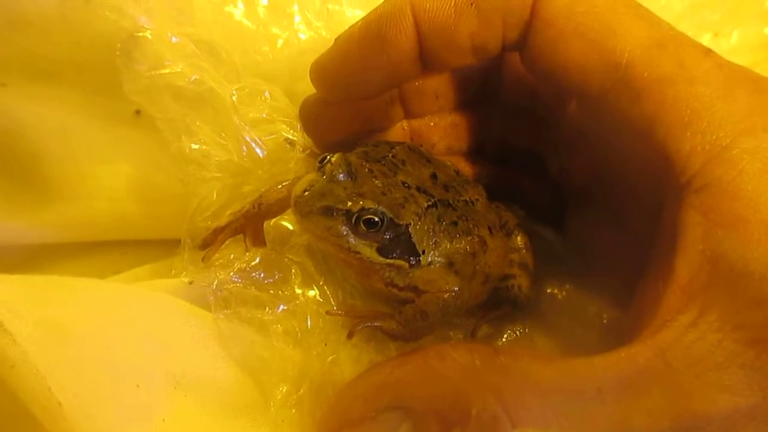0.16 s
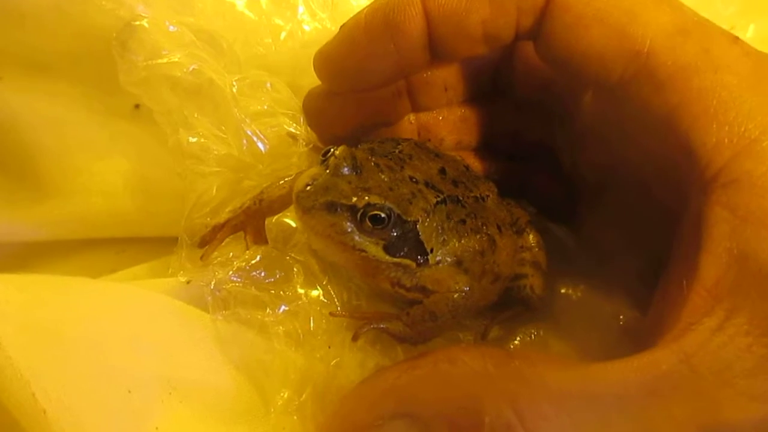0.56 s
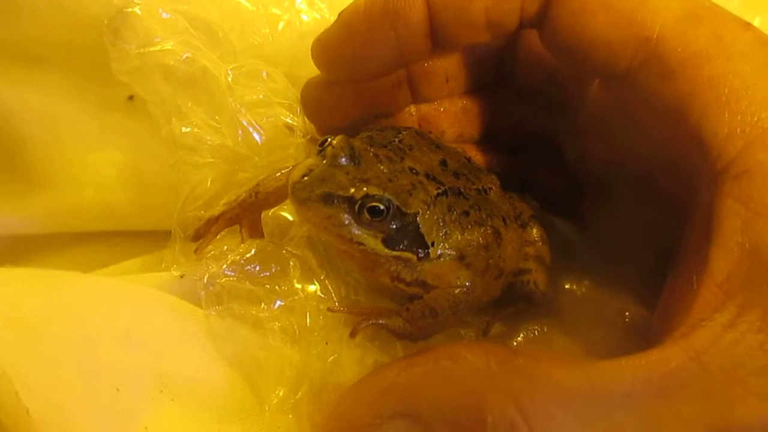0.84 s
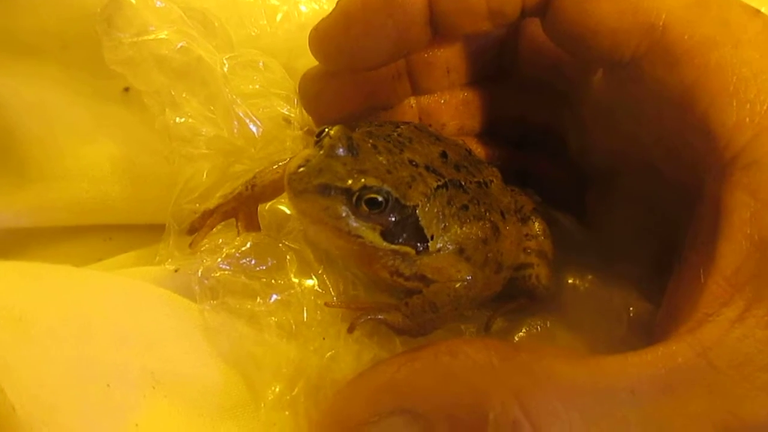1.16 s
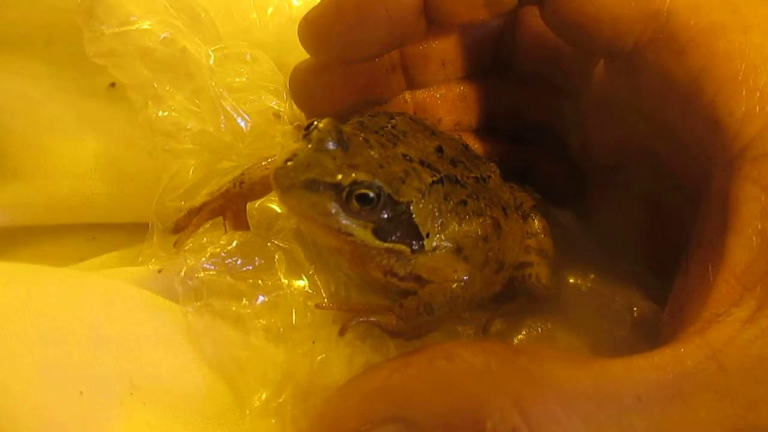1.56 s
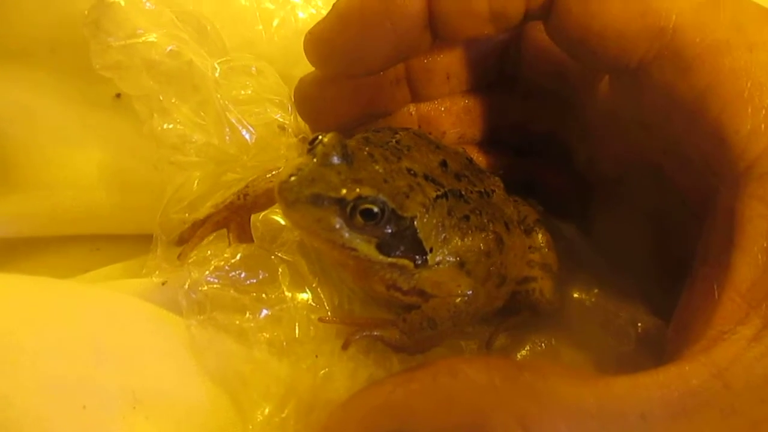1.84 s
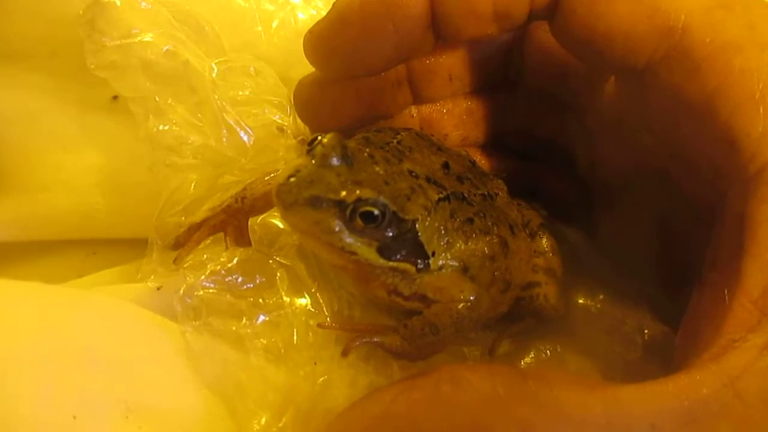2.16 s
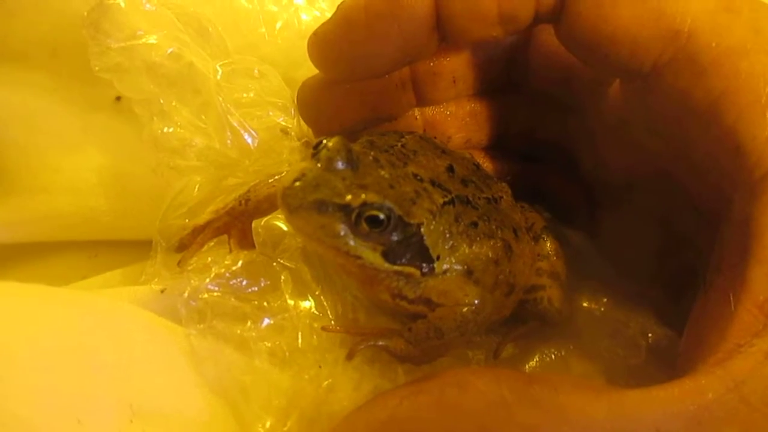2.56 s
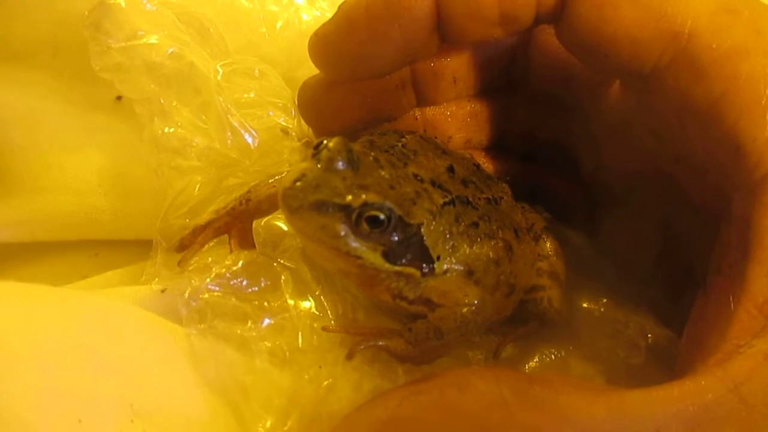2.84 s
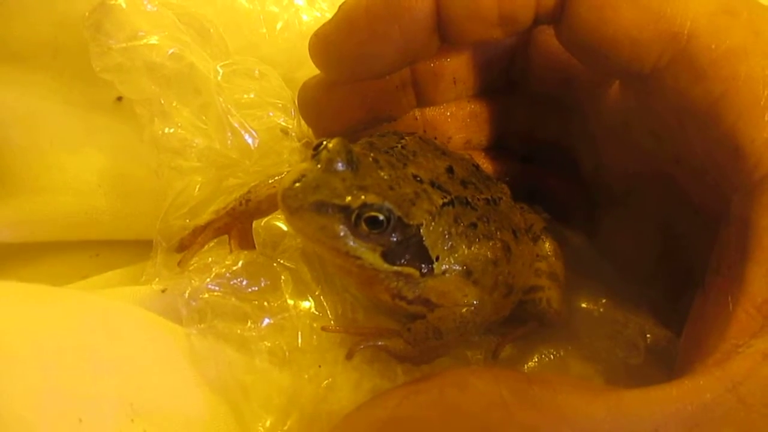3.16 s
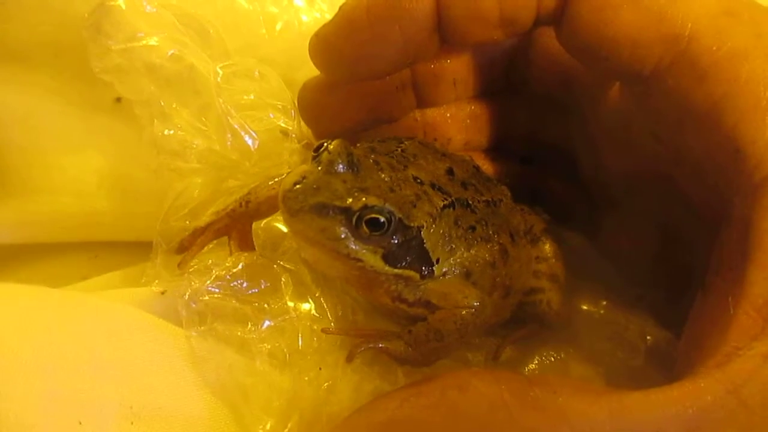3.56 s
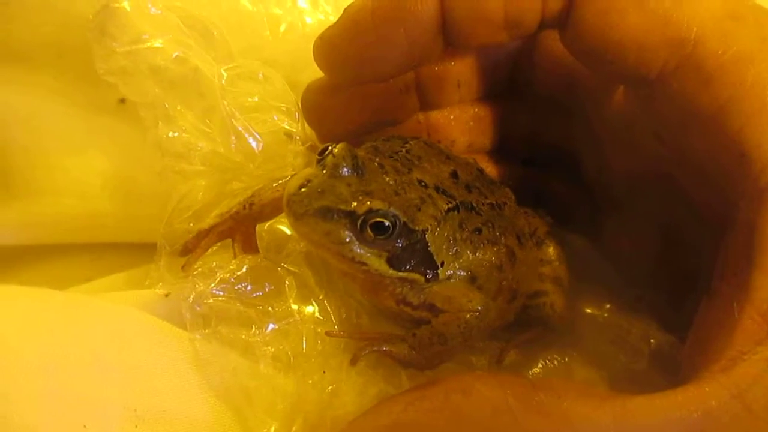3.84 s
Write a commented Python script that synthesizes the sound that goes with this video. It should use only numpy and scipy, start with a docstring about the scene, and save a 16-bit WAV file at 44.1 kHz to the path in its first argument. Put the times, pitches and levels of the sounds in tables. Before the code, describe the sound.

Close frog croaks come over the fan-like hum and hiss of a room. They start about halfway through, a rapid string of short pulses between two deeper ones, while wet plastic faintly ticks and rustles.

```python
"""A frog, cupped in a hand on wet plastic, croaks in a run of pulses, about twelve a second.
Each pulse is one larynx snap through damped throat and body resonances, with a wet rasp.
Two deep pulses leave a low ring, the lighter ones a faint higher one.
Faint wet ticks, rustles and handling bumps come over the steady hum and hiss of a room."""
import sys
import numpy as np
from scipy import signal
from scipy.fft import rfft, irfft
from scipy.io import wavfile

SR = 44100
rng = np.random.default_rng(int(sys.argv[2]) if len(sys.argv) > 2 else 0)


def dump_mix(stems):
    """Bounce the given channels to the path in sys.argv[1] as a 16-bit WAV at rate SR."""
    frames = np.atleast_2d(stems).T  # one column per channel
    limited = np.clip(frames, -1, 1)  # hard clip at full scale
    pcm = np.round(limited * 32767).astype(np.int16)
    wavfile.write(sys.argv[1], SR, pcm)


N = 176400
T = np.arange(N) / SR
HZ = np.fft.rfftfreq(N, 1 / SR)

# Light pulses. Each row: start in seconds, then snap gain, brightness, overtone and ring, all in dB.
LIGHT_PULSES = [(1.8892, -1.5, 1, -36, -60), (2.7296, 8, 5.5, -24, -41), (2.8088, 4.5, -2.5, -38, -34.5),
                (2.8861, 10, 3.5, -26.5, -32), (2.9632, 5, -5.5, -40, -36), (3.0427, 2, -3, -40, -36),
                (3.1206, 6.5, -10.5, -45, -39.5), (3.2037, 2.5, -12, -47, -46),
                (3.2854, 6.5, 1, -30.5, -44), (3.363, 4.5, -7.5, -42, -44.5), (3.4788, -11, 4.5, -47, -69),
                (3.524, 2.5, -8.5, -51, -55), (3.6040, 0.5, -12, -57, -55)]
# Deep pulses. Each row: start in seconds, then snap gain, brightness, overtone, low ring,
# throat ring and rasp offset, all in dB.
DEEP_PULSES = [(2.5380, 13.5, 0.5, -27.5, -28.5, -12.5, -1.5), (3.8872, 11, -3, -31.5, -31, -16.5, -18)]
# Throat and body resonances (+) and hollows (-). Each row: centre in Hz, width in Hz, gain in dB.
BODY_PEAKS = [(448, 136, 8.5), (541, 89, 6.5), (666, 31, -7.5), (762, 130, 3), (1015, 220, 8.5),
              (1166, 49, -3.5), (1305, 67, 14.5), (1430, 85, -8.5), (1750, 820, -10.5), (2610, 1350, -0.5)]
# Wet rasp bands. Each row: centre in Hz, width in Hz, relative level in dB.
RASP_BANDS = [(1810, 290, -1), (2490, 590, 2), (2960, 270, -8.5), (3700, 370, -4.5)]
# Wet ticks. Each row: start in seconds, level in dB.
TICKS = [(2.046, -59), (2.248, -61), (2.368, -57), (2.583, -63), (2.647, -61), (2.7286, -54.5),
         (2.886, -53), (3.445, -52.5), (3.888, -51)]
# Tick bands. Each row: centre in Hz, width in Hz, relative level in dB.
TICK_BANDS = [(2530, 500, -4), (4340, 1900, -1), (5740, 520, -1), (7400, 1400, -9)]
# Rustles. Each row: middle in seconds, length in seconds, air level in dB, hollow note level in dB.
RUSTLES = [(1.956, 0.072, -68, -53), (2.048, 0.02, -68, -62), (2.124, 0.046, -66, -62),
           (2.247, 0.02, -58, -47), (2.371, 0.02, -61.5, -60), (2.443, 0.037, -63, -75),
           (2.584, 0.0076, -59, -64), (2.642, 0.036, -56.5, -52), (2.714, 0.027, -62, -62),
           (2.953, 0.022, -60, -44.5), (3.043, 0.034, -65, -62), (3.127, 0.025, -62, -62),
           (3.205, 0.03, -66, -68), (3.35, 0.035, -69, -63), (3.451, 0.019, -65, -45),
           (3.518, 0.025, -61, -60), (3.60, 0.036, -62, -60), (3.712, 0.054, -58, -64),
           (3.804, 0.051, -65, -49.5), (3.866, 0.064, -64, -56), (3.99, 0.04, -58.5, -67)]
# Rustle bands. Each row: centre in Hz, width in Hz, relative level in dB.
RUSTLE_BANDS = [(2600, 860, 2), (3770, 700, 4.5), (5700, 800, -3.5), (7300, 1500, -16)]
# Handling bumps. Each row: middle in seconds, length in seconds, level in dB, centre in Hz.
BUMPS = [(0.511, 0.041, -49.5, 60), (0.763, 0.052, -51, 83), (1.959, 0.048, -54, 425),
         (3.99, 0.025, -48, 433)]
# Room hiss spectrum. Each row: frequency in Hz, density in dB per Hz.
HISS_SPECTRUM = [(20, -86.5), (45, -75), (100, -81.5), (250, -84.5), (400, -87.5), (600, -86),
                 (1060, -86.5), (1650, -86), (1820, -95.5), (2400, -98), (4300, -104), (7000, -105.5),
                 (10000, -109), (13000, -113), (15500, -118)]
# Fan-like hum bands. Each row: centre in Hz, width in Hz, rms level in dB.
HUM_BANDS = [(496, 63, -68), (605, 206, -57), (807, 63, -57.5), (879, 76, -61), (1143, 24, -67.5),
             (1233, 175, -59), (1295.4, 60, -52.5), (1547, 74, -64), (1645, 100, -63.5)]


def frog():
    """Light and deep pulses: snap, overtone and rings that the next pulse damps."""
    out = np.zeros(N)
    for start_s, db, bright_db, overtone_db, ring_db in LIGHT_PULSES:
        linger = ring(hz=406.6, t60_s=0.3, hold_s=gap_s(start_s))
        add(out, start_s, from_db(db) * snap(bright_db))
        add(out, start_s + 0.000963, from_db(overtone_db) * overtone(hz=1465, rise_s=0.003))
        add(out, start_s, -from_db(ring_db) * linger)
    for start_s, db, bright_db, overtone_db, low_db, throat_db, _ in DEEP_PULSES:
        low = ring(hz=146, t60_s=0.67, hold_s=gap_s(start_s))
        throat = ring(hz=619.4, t60_s=0.073, hold_s=gap_s(start_s))
        add(out, start_s, from_db(db) * snap(bright_db))
        add(out, start_s, from_db(overtone_db) * overtone(hz=1790, rise_s=0.0013))
        add(out, start_s, -from_db(low_db) * low)
        add(out, start_s + 0.00535, from_db(throat_db) * throat)
    return out


def snap(bright_db):
    """One larynx impulse through the body, plus the thump of the moving flank."""
    x = signal.unit_impulse(SR // 8) + 1e-18
    x = cut(x, hz=407, kind="high", order=5)
    x = cut(x, hz=1190, kind="low", order=2)
    x = cut(x, hz=2340, kind="low", order=6)
    for hz, width_hz, db in BODY_PEAKS:
        x = peak(x, hz, width_hz, db)
    x = peak(x, hz=1490, width_hz=1140, db=bright_db)
    x = lag(x, hz=1425, width_hz=670)   # mids trail the bass
    thump = from_db(-41.5) * ring(hz=154, t60_s=0.046, hold_s=1)[:len(x)]
    return -x - thump


def overtone(hz, rise_s):
    """Short tone that swells after the snap."""
    return np.sin(2 * np.pi * hz * T[:SR // 8]) * bloom(rise_s)


def ring(hz, t60_s, hold_s, attack_s=0.0016, damp_s=0.005):
    """One resonance: swells, decays, and is damped after hold_s."""
    t = T[:SR]
    attack = 1 - np.exp(-t / attack_s)
    damping = np.exp(-np.maximum(t - hold_s, 0) / damp_s)
    return np.sin(2 * np.pi * hz * t) * decay(t, t60_s) * attack * damping


def gap_s(start_s):
    """Time to the next pulse, 1 s at most."""
    gaps_s = [row[0] - start_s for row in LIGHT_PULSES + DEEP_PULSES if row[0] > start_s]
    return min(gaps_s + [1])


def rasp(attack_s=0.0012, bright_share=0.92):
    """Wet noise burst in the upper resonances on each pulse, stronger on bright ones."""
    t, envelope = T[:SR // 4], np.zeros(N)
    fall = decay(t, t60_s=0.018) + from_db(-18) * decay(t, t60_s=0.081)
    burst = (1 - np.exp(-t / attack_s)) * fall
    for start_s, db, bright_db, *_ in LIGHT_PULSES:
        add(envelope, start_s, from_db(db + bright_share * bright_db) * burst)
    for start_s, db, *_, rasp_db in DEEP_PULSES:
        add(envelope, start_s, from_db(db + rasp_db) * burst)
    return from_db(-46.5) * envelope * unit_rms(noise_bank(RASP_BANDS))


def reflections(x):
    """Short, weak tail from the near surroundings."""
    tail = rng.standard_normal(SR // 2) * decay(T[:SR // 2], t60_s=0.075)
    reflected = signal.fftconvolve(x, tail / np.linalg.norm(tail))[:N]
    return from_db(-8.5) * cut(reflected, hz=467, kind="high", order=2)


def ticks():
    """Tiny ticks of wet skin and plastic."""
    envelope = np.zeros(N)
    for start_s, db in TICKS:
        add(envelope, start_s, from_db(db) * bloom(rise_s=0.0018))
    return envelope * unit_rms(noise_bank(TICK_BANDS))


def rustles():
    """Short airy rustles, some with a hollow note."""
    air = unit_rms(noise_bank(RUSTLE_BANDS))
    hollow = resonant_noise(hz=626, width_hz=24)
    return sum(air * swell(mid_s, length_s, air_db) + hollow * swell(mid_s, length_s, hollow_db)
               for mid_s, length_s, air_db, hollow_db in RUSTLES)


def bumps(width_hz=72):
    """Soft handling bumps: swells of low, narrow noise."""
    return sum(resonant_noise(hz, width_hz) * swell(mid_s, length_s, db)
               for mid_s, length_s, db, hz in BUMPS)


def room_noise():
    """Steady hiss and rumble with a fan-like hum."""
    hz, db = np.transpose(HISS_SPECTRUM)
    density_db = np.interp(np.log(HZ + 1), np.log(hz), db)
    colour = from_db(density_db) * np.sqrt(SR / 2)
    hiss = irfft(rfft(rng.standard_normal(N)) * colour, N)
    return hiss + noise_bank(HUM_BANDS)


def resonant_noise(hz, width_hz):
    """Noise passed twice through one resonance; rms 1."""
    detune = (HZ ** 2 - hz ** 2) / (width_hz * (HZ + 1))
    return unit_rms(irfft(rfft(rng.standard_normal(N)) / (1 + detune ** 2), N))


def noise_bank(bands):
    """Sum of noise bands, each at its own level."""
    return sum(from_db(db) * resonant_noise(hz, width_hz) for hz, width_hz, db in bands)


def cut(x, hz, kind, order):
    """Butterworth low-pass or high-pass."""
    return signal.sosfilt(signal.butter(order, hz, kind, fs=SR, output="sos"), x)


def peak(x, hz, width_hz, db):
    """Resonance (+dB) or hollow (-dB)."""
    gain = from_db(db)
    half_width, tuning = np.tan(np.pi * width_hz / SR), -2 * np.cos(2 * np.pi * hz / SR)
    up, down = half_width * max(gain, 1), half_width * max(1 / gain, 1)
    return signal.lfilter([1 + up, tuning, 1 - up], [1 + down, tuning, 1 - down], x)


def lag(x, hz, width_hz):
    """All-pass that delays the band around hz."""
    half_width, tuning = np.tan(np.pi * width_hz / SR), -2 * np.cos(2 * np.pi * hz / SR)
    taps = [1 - half_width, tuning, 1 + half_width]
    return signal.lfilter(taps, taps[::-1], x)


def decay(t, t60_s):
    """Fall of 60 dB per t60_s."""
    return np.exp(-np.log(1000) * t / t60_s)


def bloom(rise_s):
    """Envelope that reaches 1 at rise_s, then dies away."""
    rises = T[:SR // 8] / rise_s
    return (rises * np.exp(1 - rises)) ** 2


def swell(mid_s, length_s, db):
    """Gaussian envelope around mid_s."""
    return from_db(db) * np.exp(-(2 * (T - mid_s) / length_s) ** 2)


def from_db(db):
    """Decibels to gain."""
    return 10 ** (np.asarray(db) / 20)


def unit_rms(x):
    """Scale to rms 1."""
    return x / np.sqrt(np.mean(x ** 2) + 1e-20)


def add(out, start_s, sound):
    """Mix a sound in at start_s."""
    start = int(start_s * SR)
    part = sound[:max(N - start, 0)]
    out[start:start + len(part)] += part


def scene():
    """Frog close by, room behind; mono."""
    croaks = frog() + rasp()
    return (croaks + reflections(croaks) + rustles() + bumps() + ticks() + room_noise())[None]


def record(dry):
    """Steep elliptic low-pass."""
    cutoff_hz = 15800
    return signal.sosfilt(signal.ellip(12, rp=0.1, rs=80, Wn=cutoff_hz, fs=SR, output="sos"), dry)


dry = scene()
out = record(dry)
dump_mix(out)
```